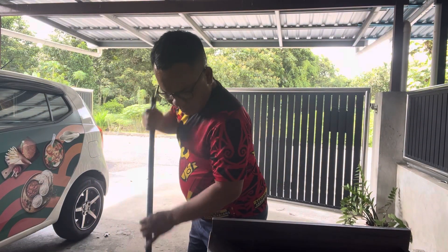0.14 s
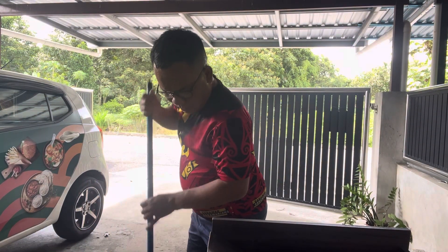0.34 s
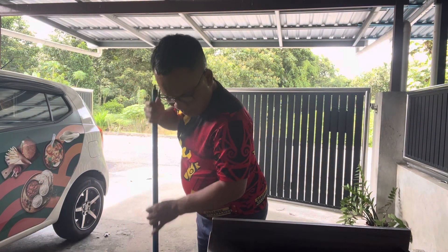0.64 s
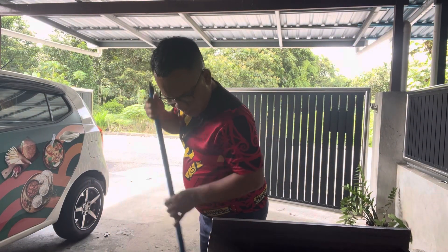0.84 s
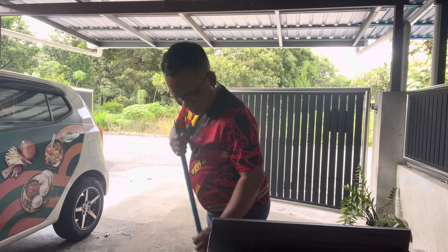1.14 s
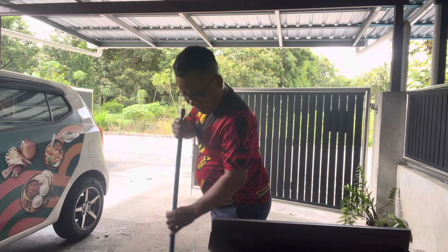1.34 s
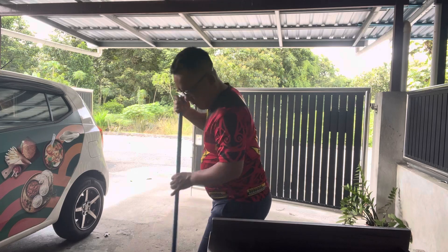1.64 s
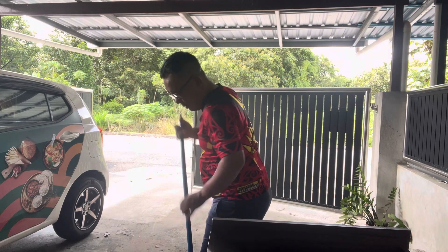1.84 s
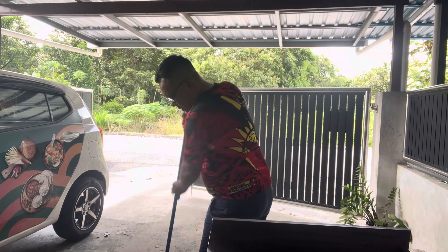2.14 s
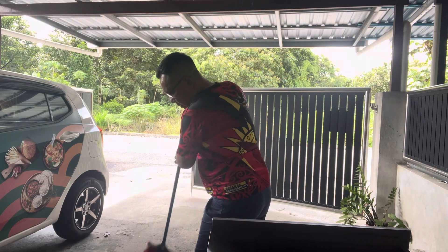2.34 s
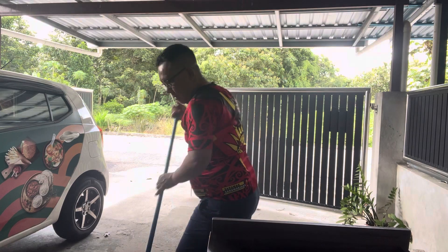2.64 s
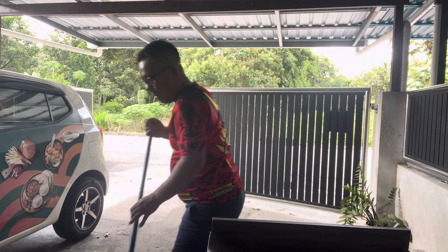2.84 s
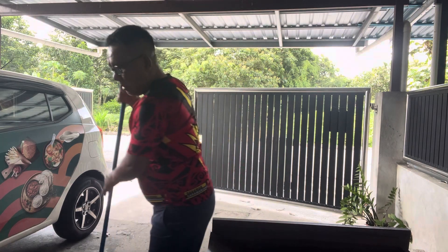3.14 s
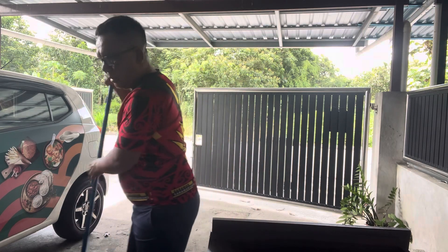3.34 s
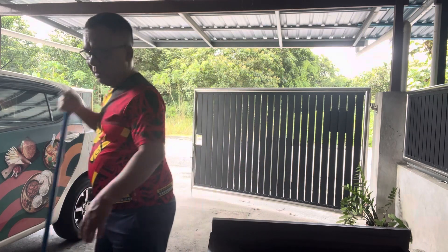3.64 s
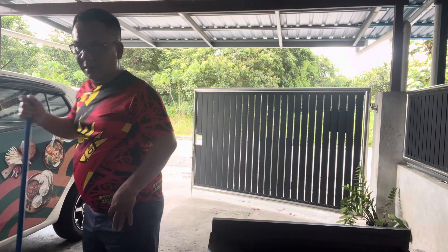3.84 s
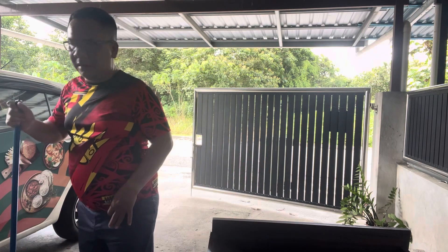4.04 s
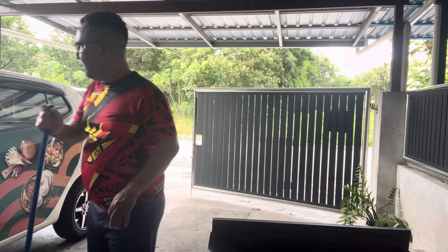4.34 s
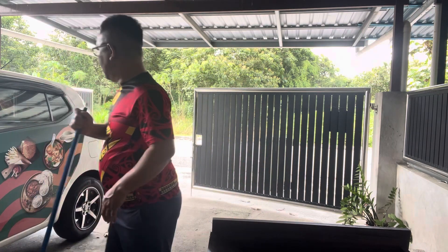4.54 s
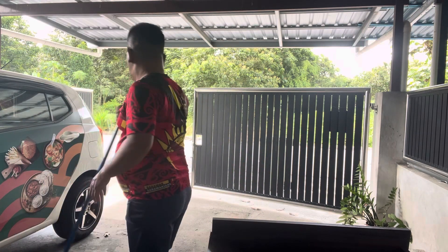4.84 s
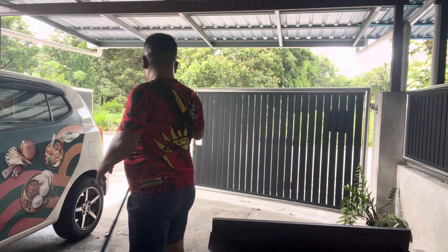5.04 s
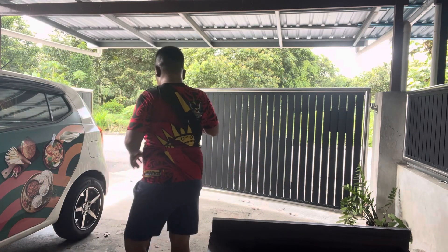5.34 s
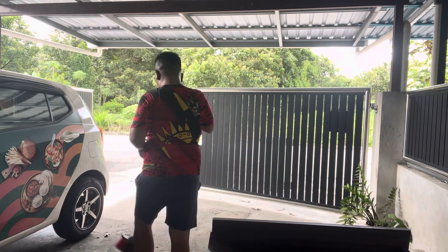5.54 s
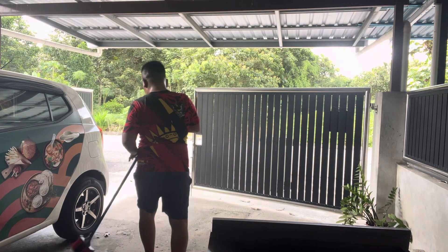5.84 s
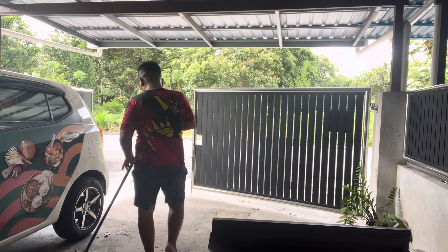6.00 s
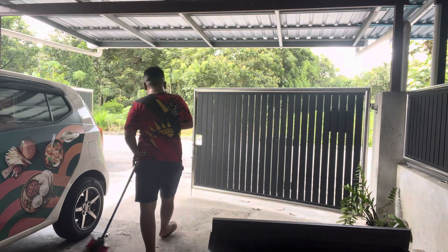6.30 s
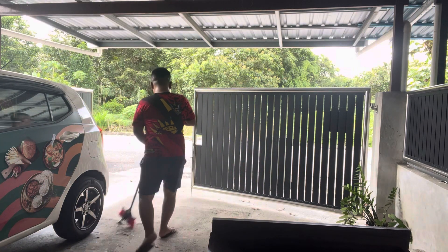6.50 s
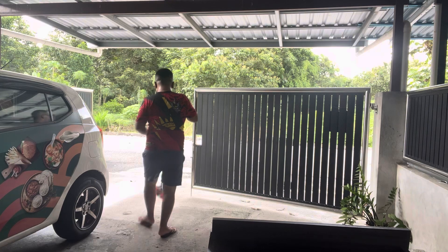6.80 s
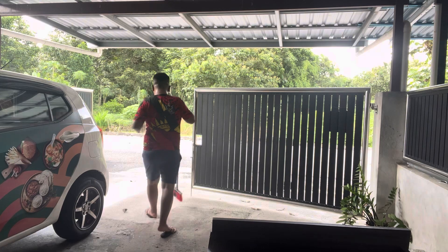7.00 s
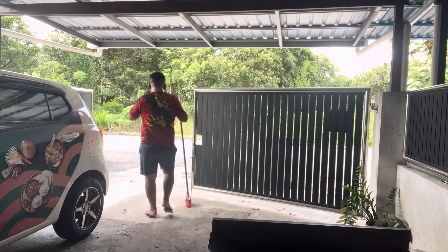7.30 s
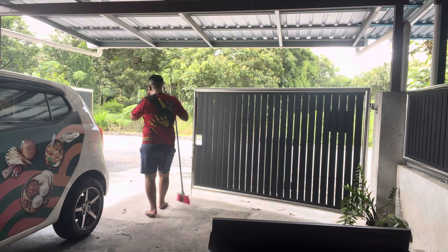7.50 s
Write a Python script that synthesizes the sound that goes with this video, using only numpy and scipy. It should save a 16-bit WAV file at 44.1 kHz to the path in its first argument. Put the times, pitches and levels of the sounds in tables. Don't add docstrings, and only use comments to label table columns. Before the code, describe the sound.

A compressor hums steadily throughout, a low buzzing motor drone with soft fan rush and a thin high whine. At 0 s a sole scuffs and the slab thuds while a swish is ending. Crisp bristle strokes follow at 0.4 and in a quick cluster from 0.9 to 1.4, with a rough drag and hollow knock near 1.0; a faint distant bird whistles at 0.75. A bright, dusty sweep comes at 1.9, a tap at 2.7, another strong sweep at 2.9. Soles scuff at 3.4, the head lands hard at 3.6, then only light brushing, with a higher bird whistle at 4.85. Dull thuds at 5.3, the sharpest tap with a scuff at 5.6. A longer swish from 6.1 runs into the loudest short stroke at 6.4. Faint trailing, a thud and scuff around 7.1 and a small tap at 7.4 finish over the hum. Short carport echo, stereo.

```python
import sys
import numpy as np
from scipy import signal
from scipy.fft import rfft, irfft, next_fast_len
from scipy.io import wavfile

SR = 44100
rng = np.random.default_rng(int(sys.argv[2]) if len(sys.argv) > 2 else 0)


def volts_from_db(level):
    exponent = np.asarray(level, float) / 20
    return 10 ** exponent


def output_pcm(signal):
    pcm = np.clip(np.atleast_2d(signal).T, -1, 1) * 32767
    wavfile.write(sys.argv[1], SR, np.round(pcm).astype(np.int16))


N = 337806

# start t/s, rise/s, hold/s, bristle hiss level/dB,
# dust re hiss/dB
STROKES = [(-.05, 0.059, 0.08, -32, -2.5), (0.416, 0.075, 0.067, -27.5, -3),
           (.9, 0.089, 0.037, -33.5, -4.5), (0.987, .08, 0.024, -27.5, -5.5),
           (1.08, 0.083, 0.26, -27, -1.5), (1.33, 0.13, .005, -34, -10), (1.904, 0.088, 0.11, -23, 2),
           (2.662, 0.0086, 0.02, -34.5, -4), (2.87, 0.086, 0.046, -24, 0.5), (3.61, 0.0074, .02, -34, 1),
           (3.618, .04, .02, -29.5, -2), (5.582, .008, 0.043, -30.5, -8), (6.08, 0.2, 0.16, -29, 2),
           (6.379, .012, .03, -24.5, 0), (6.385, .055, 0.017, -20, -4), (7.085, 0.011, 0.047, -37.5, -4.5),
           (7.128, .015, .01, -40, -2),
           (0.806, .1, .02, -44.5, -5), (1.57, 0.054, .03, -43, -15), (3.367, 0.053, 0.039, -40, -7.5),
          (3.79, 0.15, 0.092, -40, -0.5), (4.05, .08, .12, -48, -5), (4.32, 0.32, .02, -39, 0.5),
          (4.67, 0.076, 0.009, -41.5, -1), (5.073, 0.023, .005, -38.5, -11), (5.19, .04, .005, -42, -13),
          (5.703, 0.056, .13, -44, -10), (5.93, 0.093, 0.13, -44.5, -2), (6.753, 0.035, 0.02, -43.5, -5.5),
          (6.87, .05, 0.16, -49, -14), (7.367, 0.047, .005, -39.5, -5.5)]
# f/Hz, density/dB per Hz
BRISTLE_SPECTRUM = [(700, -13), (1300, -6.5), (1900, -5.5), (3000, 0), (4000, -0.5), (5000, -1.5),
                    (6000, 0), (7400, 3), (8200, -2), (9300, -18.5), (10300, -40)]
# f/Hz, density/dB per Hz
DUST_SPECTRUM = [(7000, -40), (8200, 2.5), (9300, 0), (10500, -2), (11500, -0.5), (12500, 3.5), (13500, 3),
                 (14500, 5), (15700, 0)]
# mains multiple/1, rotor multiple/1, left level/dB, right level/dB
HUM = [(0, 1, -42, -39.5), (1, 1, -38, -40), (0, 3, -35, -31.5), (2, 0, -38.5, -38.5), (1, 2, -67, -39),
       (3, -1, -63, -46), (0, 4, -78, -56), (4, -2, -40, -62), (-1, 6, -28.5, -47), (1, 3, -40, -61),
       (3, 0, -27.5, -31), (0, 5, -33.5, -36.5), (2, 2, -53, -33.5), (-1, 7, -53, -45.5),
       (1, 4, -37, -38.5), (3, 1, -65, -49), (0, 6, -49.5, -30.5), (4, 0, -29, -28), (0, 7, -41.5, -40),
       (1, 6, -58, -43), (5, 0, -45, -42), (1, 7, -46, -38), (0, 9, -45.5, -49), (2, 6, -49.5, -45.4),
       (0, 10, -46, -55), (1, 9, -38, -40.5),
       (-1, 9, -44.5, -44), (0, 14, -56, -56), (0, 16, -57, -56), (0, 17, -40, -55)]
# mains sideband/1, left level/dB, right level/dB
WHINE = [(-1, -46.5, -44.5), (0, -34.5, -47), (1, -45, -57)]
# f/Hz, density/dB per Hz
RUSH_SPECTRUM = [(28, -72), (45, -55), (64, -55), (80, -58.5), (128, -52), (230, -55.5), (400, -55),
                 (900, -59.5), (1700, -68), (4000, -81), (6500, -91.5), (9000, -95), (14900, -93),
                 (15600, -72)]
# t/s, length/s, level/dB, low resonance f/Hz, high resonance f/Hz
SCUFFS = [(0, 0.062, -27, 470, 1180), (1.384, 0.074, -24.5, 774, 1150), (2.662, 0.11, -32.5, 1140, 2090),
          (3.381, 0.035, -29, 1330, 2200), (3.414, 0.028, -31, 1260, 2300),
          (3.442, 0.023, -21.5, 1020, 1490), (5.087, 0.03, -38, 4200, 5500), (5.215, 0.02, -33, 1900, 2770),
          (5.229, 0.032, -30.5, 2140, 2600), (5.586, 0.11, -27.5, 1056, 2060),
          (7.133, 0.021, -25, 705, 1880)]
# t/s, length/s, level/dB, low resonance f/Hz, high resonance f/Hz
DRAGS = [(0.416, 0.054, -33, 900, 1830), (0.948, 0.026, -27.5, 820, 1880), (0.996, 0.063, -28.5, 806, 1490),
         (1.035, 0.11, -24, 940, 1860), (1.601, 0.058, -24, 860, 2300), (1.983, 0.054, -40, 655, 1100),
         (2.438, 0.044, -40, 2000, 3650), (3.611, 0.049, -32.5, 1550, 2280),
         (4.514, 0.034, -35.5, 900, 2240), (5.872, 0.06, -32, 1010, 2160), (6.425, 0.068, -36, 990, 2200),
         (7.093, 0.036, -35, 1180, 2250), (7.4, 0.054, -31.5, 2000, 3220)]
# f/Hz, density/dB per Hz
RASP_SPECTRUM = [(250, -22), (500, 6), (1300, -6.5), (2500, -7), (4500, -18), (8000, -43)]
# t/s, peak level/dB, f/Hz, t60/s
THUDS = [(0.014, -14, 125, 0.13), (0.111, -18.5, 129, 0.21), (.54, -21.5, 124.5, 0.29),
         (1.035, -16.5, 411.5, 0.31), (1.065, -12.5, 380, 0.13), (2.55, -21, 117, 0.17),
         (5.3, -16.5, 207.4, 0.42), (5.345, -11.5, 127.7, 0.28), (5.4, -20, 121, .3),
         (7.009, -25, 184, 0.28), (7.12, -19, 125, 0.25), (.52, -24, 187, 1), (5.32, -19.5, 467, 0.21),
         (5.34, -25, 62, .5), (6.22, -30, 490, 0.16), (6.9, -24, 190.4, .4), (7.24, -23, 196.7, 0.75),
         (7.142, -13, 565, 0.048)]
# t/s, peak level/dB, f/Hz
TAPS = [
    (0.4599, -23, 3780),
    (0.9532, -20, 1890),
    (2.6668, -16.5, 2100),
    (2.8878, -20, 1200),
    (3.6137, -14, 1540),
    (5.5844, -13.5, 2150),
    (7.143, -23, 1090),
    (7.4071, -22, 2300),
]
# t/s, length/s, f/Hz, level/dB
BIRD = [
    (.755, 0.11, 4550, -44),
    (4.85, .115, 5500, -44),
]
# f/Hz, likeness/0-1, right lag/rad, left re right/dB
PORTS = [(30, 0.97, .05, 4), (60, 0.73, .1, -1.5), (200, 0.7, 0.24, 2.5), (371, 0.6, 0.64, 3.5),
         (598, 0.45, 2.34, 1.5), (1270, 0.37, 1.82, 3), (2600, 0, 5.3, 2), (4600, 0.05, 6.4, -1.5),
         (6470, 0.15, 7.62, 1), (7660, 0.6, 8.28, 3.5), (8240, 0.83, 9.42, 2.5), (10620, 1, 12.57, -0.5),
         (13460, 0.94, 15.5, 0.5), (15600, 0.7, 18.96, 1)]

RISE_POWER = 1.31
HISS_FADE_DB_PER_S, DUST_FADE_DB_PER_S = 116.5, 157
LINGER_DB, LINGER_FADE_DB_PER_S = -28, 25
HISS_REST_DB, DUST_REST_DB = -47.5, -63.5
MAINS_HZ, ROTOR_HZ, CARRIER_HZ = 99.99, 63.93, 6999.4
SCUFF_HIGH_DB, DRAG_HIGH_DB = -10, 0
LOUD_DB, SQUEEZE, RECOVER_DB_PER_S, GRIP_S = -28.5, 0.36, 7, 0.14
CUTOFF_HZ = 15750
FRAME, GRID = 1024, 542
BAND_BINS, FIRST_BAND = 32, 10
PATCH_BINS, FIRST_PATCH = 8, 14
QUIET_TILT_DB, MARGIN_TILT_DB = 0.25, -0.08
PATCH_UNDER_DB, RAGGED_DB = 8, -1.5


def at_hz(rows, hz):
    known_hz, *columns = np.transpose(rows)
    return [np.interp(np.log(hz + 1), np.log(known_hz), c) for c in columns]


def colour(x, spectrum):
    size = next_fast_len(N)
    db, = at_hz(spectrum, np.arange(size // 2 + 1) * SR / size)
    return irfft(rfft(x, size) * volts_from_db(db) * np.sqrt(SR / 2), size)[..., :N]


def rms_one(x):
    return x / np.sqrt(np.mean(x ** 2) + 1e-20)


def drift(rate_hz):
    r = np.exp(-80 * np.pi * rate_hz / SR)
    slow = signal.lfilter([1], [1, -2 * r, r * r], rng.standard_normal(N // 40 + 2002))[2000:]
    return np.interp(np.arange(N) / 40, np.arange(len(slow)), rms_one(slow))


def slips(per_s, spread_db, diffuse):
    sizes = volts_from_db(spread_db * np.minimum(rng.exponential(1, (2, N)), 4))
    sizes = sizes * rng.choice([-1, 1], (2, N))
    clicks = rms_one(sizes * (rng.random((2, N)) < per_s / SR))
    return rms_one(clicks + diffuse * rng.standard_normal((2, N)))


def stroke_level(fade_db_per_s, rest_db, dusty):
    t = np.arange(0, N + 32, 32) / SR
    s, rise, hold, db, dust_db = np.array(STROKES).T[..., None]
    after = np.maximum(t - s - rise - hold, 0)
    fade = volts_from_db(-fade_db_per_s * after) ** 2 + volts_from_db(LINGER_DB - LINGER_FADE_DB_PER_S * after) ** 2
    push = np.clip((t - s) / rise, 0, 1) ** RISE_POWER
    power = (volts_from_db(db + dusty * dust_db) * push) ** 2 * fade
    return np.interp(np.arange(N) / SR, t, 10 * np.log10(power.sum(axis=0) + volts_from_db(rest_db) ** 2))


def broom():
    hiss_db = stroke_level(HISS_FADE_DB_PER_S, HISS_REST_DB, False)
    dust_db = stroke_level(DUST_FADE_DB_PER_S, DUST_REST_DB, True)
    chatter = drift(50)
    hiss = rms_one(colour(slips(7000, spread_db=3.5, diffuse=1.5), BRISTLE_SPECTRUM))
    dust = rms_one(colour(slips(9000, spread_db=2.0, diffuse=0.68), DUST_SPECTRUM))
    hiss_gain = volts_from_db(hiss_db + 5.5 + 0.81 * chatter + 0.44 * drift(19))
    dust_gain = volts_from_db(dust_db + 11.0 + 0.85 * chatter + 0.53 * drift(150))
    return hiss * hiss_gain + dust * dust_gain


def tones(rows, t, wobble):
    out = 0
    for hz, rotor, left_db, right_db in rows:
        phase = 2 * np.pi * (hz * t + rng.random()) + 0.03 * rotor * wobble
        lag = at_hz(PORTS, hz)[1]
        out = out + volts_from_db(np.array([[left_db], [right_db]])) * np.sin([phase, phase - lag])
    return np.sqrt(2) * out


def compressor():
    t, wobble = np.arange(N) / SR, drift(1.4)
    low = [(m * MAINS_HZ + r * ROTOR_HZ, r, left, right) for m, r, left, right in HUM]
    high = [(CARRIER_HZ + m * MAINS_HZ, 0, left, right) for m, left, right in WHINE]
    hum = signal.resample_poly(tones(low, t[::10], wobble[::10]), 10, 1, axis=1)[:, :N]
    whine = tones(high, t, 0)
    return hum * volts_from_db(0.56 * drift(3.5)) + whine * volts_from_db(0.41 * drift(33))


def fan_rush():
    return colour(rng.standard_normal((2, N)), RUSH_SPECTRUM) * volts_from_db(1.17 * drift(2.4))


def resonance(x, hz, width_hz):
    r = np.exp(-np.pi * width_hz / SR)
    return rms_one(signal.lfilter([1, 0, -1], [1, -2 * r * np.cos(2 * np.pi * hz / SR), r * r], x))


def scuffs_and_drags():
    rub = slips(1500, spread_db=4.0, diffuse=1.0)
    rasp = rms_one(colour(rub, RASP_SPECTRUM))
    out = np.zeros((2, N))
    events = [(*row, SCUFF_HIGH_DB) for row in SCUFFS] + [(*row, DRAG_HIGH_DB) for row in DRAGS]
    for s, length, db, low_hz, high_hz, high_db in events:
        part = slice(max(round(s * SR), 0), round((s + length + 0.14) * SR))
        piece = rub[:, part]
        t = np.arange(piece.shape[1]) / SR
        after = np.maximum(t - 0.81 * length, 0)
        attack = np.sin(np.pi / 2 * np.minimum(t / (0.17 * length), 1))
        fall = 0.73 * volts_from_db(-60 * after / 0.074) + 0.3 * volts_from_db(-60 * after / 0.93)
        low = resonance(piece, low_hz, 0.07 * low_hz)
        high = resonance(piece, high_hz, 0.45 * high_hz)
        rings = low + volts_from_db(high_db) * high
        out[:, part] += volts_from_db(db - 3.0) * attack * fall * (rings + 1.31 * rasp[:, part])
    return out


def thuds():
    out, t = np.zeros(N + SR), np.arange(SR // 2) / SR
    for s, db, hz, t60 in THUDS:
        start = round(s * SR)
        swell = 1 - np.exp(-t * hz / 0.43)
        out[start:start + len(t)] += volts_from_db(db - 60 * t / t60) * swell * np.sin(2 * np.pi * hz * t)
    return out[:N]


def taps():
    out, t = np.zeros((2, N + 9000)), np.arange(9000) / SR
    fall = 1.2 * volts_from_db(-60 * t / 0.046) + 0.26 * volts_from_db(-60 * t / 0.23)
    for s, db, hz in TAPS:
        start = round(s * SR)
        sos = signal.butter(1, [hz * 0.8, min(hz * 0.99, 15000)], "band", fs=SR, output="sos")
        burst = rms_one(signal.sosfilt(sos, rng.standard_normal((2, 9000))))
        out[:, start:start + 9000] += volts_from_db(db - 12.5) * burst * fall
    return out[:, :N]


def bird():
    out = np.zeros(N)
    for s, length, hz, db in BIRD:
        start = round(s * SR)
        t = np.arange(round(length * SR)) / SR
        warble = 3.2 * np.sin(2 * np.pi * 45 * t)
        whistle = np.sin(2 * np.pi * hz * t + warble)
        out[start:start + len(t)] += volts_from_db(db) * signal.windows.tukey(len(t), 0.5) * whistle
    return out


def ports(pair):
    size = next_fast_len(N)
    hz = np.arange(size // 2 + 1) * SR / size
    alike, _, balance_db = at_hz(PORTS, hz)
    alike = np.clip(alike, 0, 1)
    lag = np.interp(hz, np.array(PORTS)[:, 0], np.array(PORTS)[:, 2])
    left, own = rfft(pair, size)
    right = alike * left * np.exp(-1j * lag) + np.sqrt(1 - alike ** 2) * own
    return irfft([left * volts_from_db(balance_db / 2), right * volts_from_db(-balance_db / 2)], size)[:, :N]


def gain_control():
    dust_db = stroke_level(DUST_FADE_DB_PER_S, DUST_REST_DB, True)
    over_db = SQUEEZE * np.maximum(dust_db - LOUD_DB, 0)
    creep_db = RECOVER_DB_PER_S * np.arange(N) / SR
    held_db = np.maximum.accumulate(over_db + creep_db) - creep_db
    r = np.exp(-1 / (GRIP_S * SR))
    return volts_from_db(-signal.lfilter([1 - r], [1, -r], held_db))


def scene():
    gain = gain_control()
    floor = broom() + scuffs_and_drags() + thuds() + taps()
    return ports(floor + bird() + gain * fan_rush()) + gain * compressor()


def thin_treble(x, margin_db, quiet_db, jitter_db):
    halves = np.pad([x[0] + x[1], x[0] - x[1]], ((0, 0), (FRAME - GRID, 0))) / 2
    hz, s, bins = signal.stft(halves, SR, "cosine", 2 * FRAME, FRAME)
    bands = bins[:, :FRAME].reshape(2, -1, BAND_BINS, len(s))
    db = 10 * np.log10(np.sum(np.abs(bands) ** 2, axis=2) + 1e-16)
    height = np.arange(len(db[0]))[:, None] - FIRST_BAND
    partner_limit = db[::-1] - margin_db - MARGIN_TILT_DB * height
    limit = np.maximum(partner_limit, quiet_db + QUIET_TILT_DB * height)
    limit = limit + jitter_db * rng.standard_normal(db.shape)
    from_tap_s = np.abs(s - (FRAME - GRID) / SR - np.array(TAPS)[:, :1]).min(axis=0)
    steady = from_tap_s > FRAME / SR / 2
    empty = (db < limit) & steady & (height >= 0)
    bins[:, :FRAME] *= np.repeat(~empty, BAND_BINS, axis=1)

    patches = bins[:, :FRAME].reshape(2, -1, PATCH_BINS, len(s))
    patch_db = 10 * np.log10(np.mean(np.abs(patches) ** 2, axis=2) * BAND_BINS + 1e-16)
    middle_db = 10 * np.log10(np.median(np.abs(bands) ** 2, axis=2) * BAND_BINS + 1e-16) - PATCH_UNDER_DB
    patch_limit = np.where(height > 0, np.maximum(middle_db, limit + RAGGED_DB), middle_db)
    weak = patch_db < np.repeat(patch_limit, BAND_BINS // PATCH_BINS, axis=1)
    weak[:, :FIRST_PATCH] = False
    bins[:, :FRAME] *= np.repeat(~(weak & steady), PATCH_BINS, axis=1)

    kept = bins * (hz < CUTOFF_HZ)[:, None]
    total, apart = signal.istft(kept, SR, "cosine", 2 * FRAME, FRAME)[1][:, FRAME - GRID:][:, :N]
    return np.array([total + apart, total - apart])


def low_pass(x):
    return signal.sosfilt(signal.butter(12, 17090, fs=SR, output="sos"), x)


def record(dry):
    rounded = 1.26 * np.tanh(dry / 1.352)
    thinned = thin_treble(rounded, margin_db=6.0, quiet_db=-69.5, jitter_db=1.5)
    return low_pass(thinned)


dry = scene()
out = record(dry)
output_pcm(out)
```